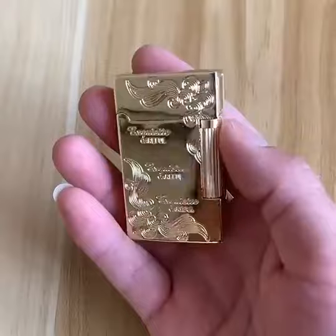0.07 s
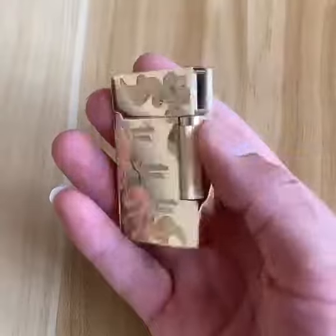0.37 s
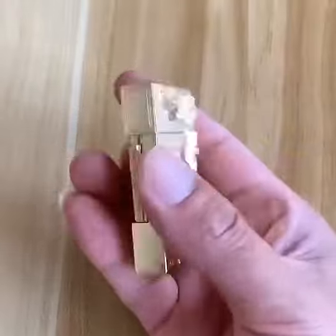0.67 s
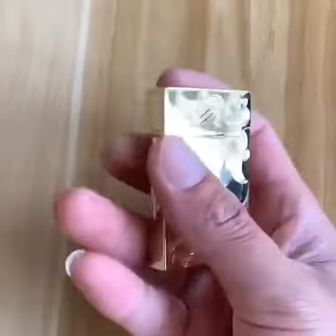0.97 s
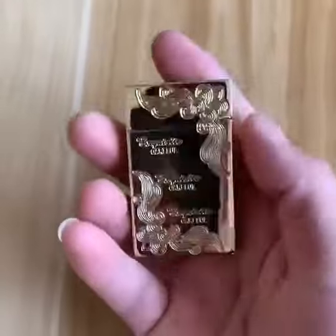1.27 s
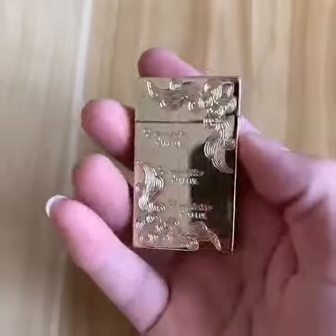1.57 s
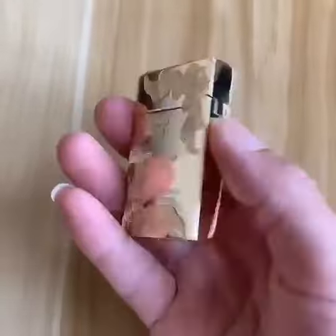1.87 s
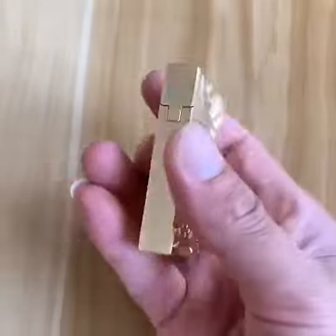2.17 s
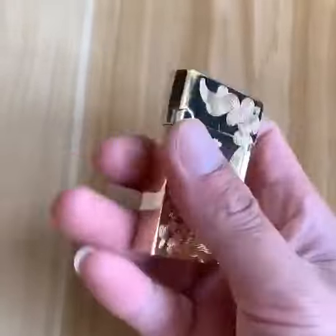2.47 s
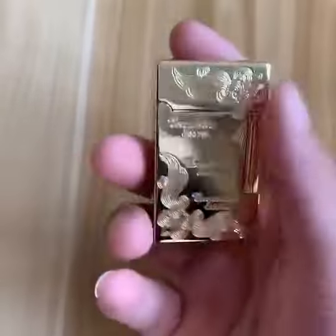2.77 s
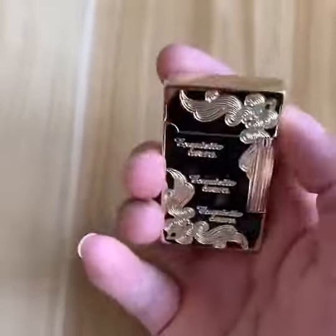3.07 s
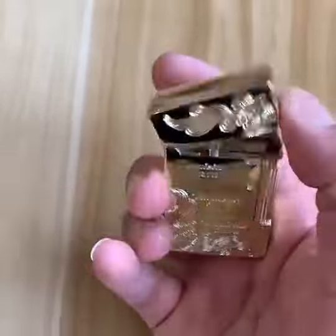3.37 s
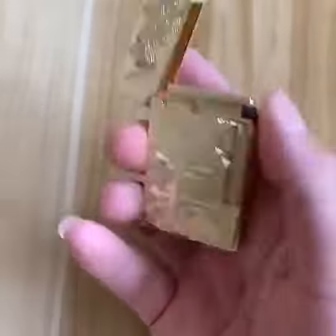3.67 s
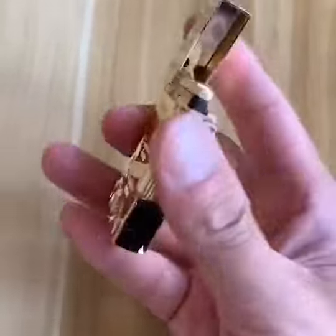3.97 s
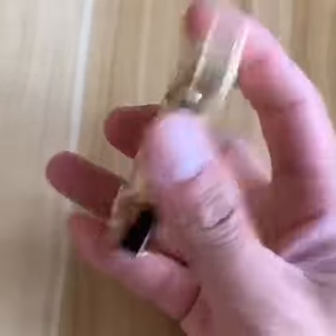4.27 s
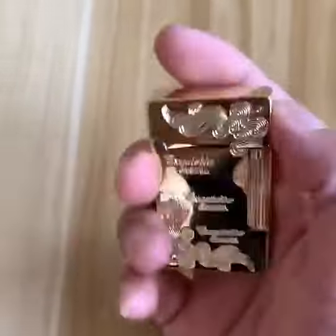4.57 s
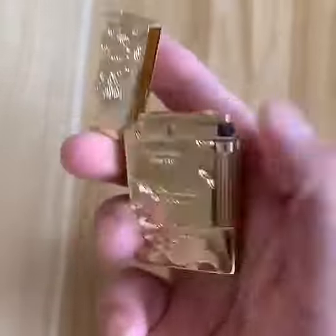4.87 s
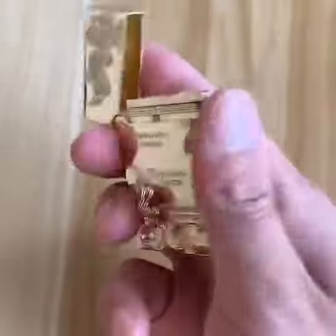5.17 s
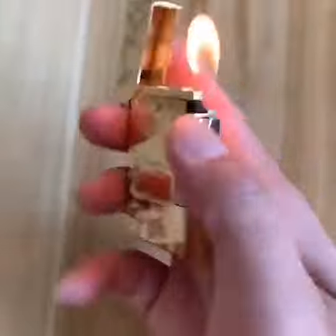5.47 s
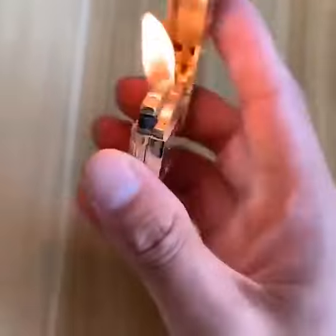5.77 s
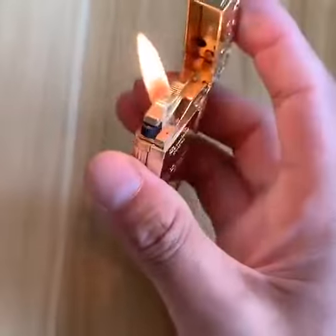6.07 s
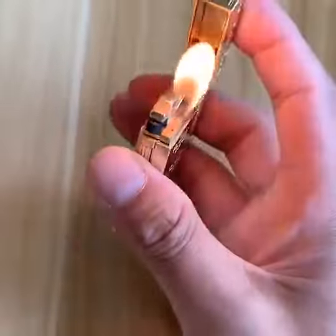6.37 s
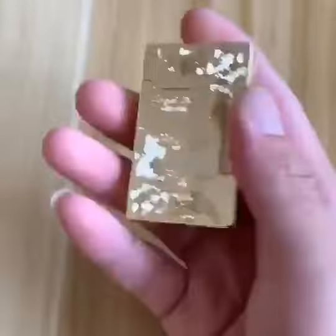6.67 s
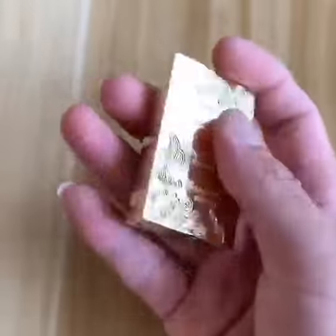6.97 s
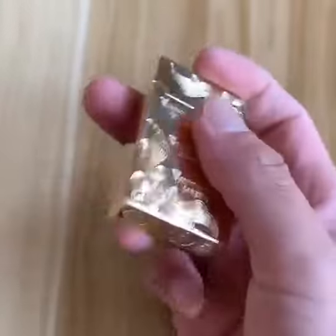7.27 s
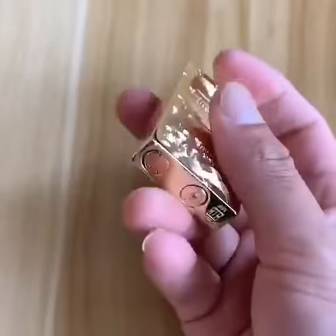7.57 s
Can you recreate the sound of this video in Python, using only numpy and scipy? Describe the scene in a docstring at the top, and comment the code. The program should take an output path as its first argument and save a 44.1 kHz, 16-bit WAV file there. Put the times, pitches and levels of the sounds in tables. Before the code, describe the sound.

Close up, a heavy lighter opens with a bright ring and clacks closed, then reopens, rasps alight and shuts again in a softly humming room.

```python
"""A heavy metal lighter, close up: twice its lid springs open with a bright ping and is snapped shut.
The sprung lid hits its stop, bounces and rings; shut, the case gives a clack that the hand damps.
In between, the flint wheel rasps once and the gas catches with a soft pop. Fingers brush the case.
Behind it is a small live room with a rush of air and a low hum. A limiter ducks the loudest clicks."""
import sys
import numpy as np
from scipy import signal
from scipy.fft import rfft, irfft, next_fast_len
from scipy.io import wavfile
from scipy.ndimage import uniform_filter1d, minimum_filter1d

SR = 44100
rng = np.random.default_rng(int(sys.argv[2]) if len(sys.argv) > 2 else 0)


def bounce(signal):
    """Save signal as a 16-bit WAV file at the path given by the first command-line argument."""
    frames = np.transpose(np.atleast_2d(signal))
    limited = np.clip(frames, -1, 1)
    pcm = np.round(limited * 32767).astype(np.int16)
    wavfile.write(sys.argv[1], SR, pcm)


N = 344421


def amp(db):
    """Decibels to gain."""
    return 10 ** (np.asarray(db) / 20)


def unit(x):
    """Scales to rms 1."""
    return x / np.sqrt(np.mean(x ** 2) + 1e-20)


def curve(points, hz):
    """Reads a breakpoint curve along a log-frequency axis."""
    f, value = np.transpose(points)
    return np.interp(np.log(hz + 1), np.log(f + 1), value)


def add(mix, s, sound):
    """Mixes a sound in at s seconds."""
    part = mix[round(s * SR):][:len(sound)]
    part += sound[:len(part)]


def eq(x, points, size=2048):
    """Minimum-phase EQ through (f/Hz, gain/dB) points."""
    log_gain = np.log(amp(curve(points, abs(np.fft.fftfreq(size, 1 / SR)))))
    taps = np.fft.ifft(np.exp(np.conj(signal.hilbert(log_gain)))).real
    return signal.fftconvolve(x, taps)[:len(x)]


def drift(hz):
    """Smooth random modulation, rms 1, rolling off above hz."""
    f = np.fft.rfftfreq(N, 1 / SR)
    return unit(irfft(rfft(rng.standard_normal(N)) * np.exp(-(f / hz) ** 2), N))


def crack(decay_s, size=512):
    """One contact transient: a dense, flat burst of energy 1, gone in a few milliseconds."""
    age = (np.arange(size) + 1) / SR / decay_s
    swell = age * np.exp(-age)
    burst = rng.standard_normal(size) * swell
    for _ in range(3):  # whiten, then tighten the envelope again
        spectrum = rfft(burst)
        burst = irfft(spectrum / (abs(spectrum) + 1e-12)) * swell ** (1 / 4)
    return burst / np.linalg.norm(burst)


# lag of the right microphone: f/Hz, delay/s
MIC_LAG = [(2000, .0001), (4000, .000078), (5300, .000094), (8200, .00012), (12200, .000122)]
def mic_pair(x):
    """Direct sound reaches the right microphone a little after the left."""
    size = next_fast_len(N)
    hz = np.fft.rfftfreq(size, 1 / SR)
    lag = np.exp(-2j * np.pi * hz * curve(MIC_LAG, hz))
    return np.array([x, irfft(rfft(x, size) * lag, size)[:N]])


# tone of the air bed: f/Hz, relative level/dB
AIR_EQ = [(12, -32.5), (22, 1.5), (32, -15.5), (60, -8.5), (145, -7.5), (176, -6), (259, -12), (290, -13.5),
          (463, -19.5), (531, -15.5), (590, -26.5), (720, -22.5), (922, -28.5), (1300, -31.5), (1600, -30),
          (2170, -41), (3900, -46), (5600, -53.5), (7600, -59), (11000, -62.5), (14000, -67),
          (15000, -85.5)]
# its stereo image: f/Hz, left-right correlation
AIR_CORRELATION = [(60, 1.0), (130, 0.99), (290, 0.98), (640, -0.39), (1410, 0.2), (3100, -0.71),
                   (5200, -0.5), (8000, 0.9), (11500, -0.81), (14000, .3)]
# lead of its left side: f/Hz, phase/rad
AIR_LEAD = [(20, 0), (180, .13), (500, .4), (1500, 0)]
def room_air(level_db=-42.5):
    """A low, steady rush of air whose level wavers slightly."""
    hz = np.fft.rfftfreq(N, 1 / SR)
    left, other = rfft(rng.standard_normal((2, N)))
    alike = np.clip(curve(AIR_CORRELATION, hz), -1, 1)
    right = (alike * left + np.sqrt(1 - alike ** 2) * other) * np.exp(-1j * curve(AIR_LEAD, hz))
    air = irfft(np.array([left, right]) * amp(curve(AIR_EQ, hz)), N)
    return unit(air) * amp(level_db + .8 * drift(hz=5))


# low drone of the room: f/Hz, level/dB
HUM_TONES = [(68, -57.5), (175.5, -49.5), (286, -61), (528, -64)]
# faint fan whine: f/Hz, level/dB
FAN_TONES = [(1125, -79.5), (1497, -75), (1610, -75)]
def room_hum():
    """Hum and fan tones, each wavering in level and phase."""
    hum, t = np.zeros(N), np.arange(N) / SR
    for hz, db in HUM_TONES + FAN_TONES:
        peak = np.sqrt(2) * amp(db + .61 * drift(hz=3.5))
        hum += peak * np.sin(2 * np.pi * hz * t + .8 * drift(hz=3.3))
    return hum


# early reflections: t/s, relative level/dB
REFLECTIONS = [(0.0156, -22.5), (0.0186, -24.5), (0.0322, -23), (0.0368, -24), (.0408, -24), (0.045, -27.5)]
# reverb time: f/Hz, t60/s
REVERB_DECAY = [(500, .5), (2000, 0.55), (4200, 0.6533), (5400, 0.61), (7000, 0.5), (9500, 0.53),
                (11400, 0.4659), (14000, 0.31), (15000, 0.03)]
# reverb width: f/Hz, side over mid/dB
REVERB_WIDTH = [(1000, -9.5), (2800, 8), (4000, -1), (5400, 9.5), (6700, -8.5), (8300, -19), (10500, 4),
                (12300, 21), (14000, -2)]
def room_reverb(send, predelay_s=.0095, build_s=.006):
    """The walls return single echoes and a diffuse tail whose top end dies first."""
    t = np.arange(SR) / SR
    build = 1 - np.exp(-np.maximum(t - predelay_s, 0) / build_s)
    taps = amp(-30.5) * build * rng.standard_normal((2, SR))
    for delay, db in REFLECTIONS:
        for channel in taps:
            add(channel, delay, amp(db) * rng.choice([-1., 1.], 1))
    hz, age, bands = signal.stft(taps, SR, nperseg=256)
    bands = bands * amp(-60 * age / curve(REVERB_DECAY, hz)[:, None])
    width = amp(curve(REVERB_WIDTH, hz))[:, None]
    mid_side_gain = np.array([np.ones_like(width), width]) / np.hypot(1, width)
    mid, side = signal.istft(bands * mid_side_gain, SR, nperseg=256)[1]
    return signal.fftconvolve(send[None], np.array([mid + side, mid - side]), axes=1)[:, :N]


def hand_scatter(x, level_db=-13):
    """The cupped hand throws very short reflections, different at each microphone."""
    return amp(level_db) * np.array([signal.oaconvolve(x, crack(decay_s=.00015))[:N] for _ in range(2)])


# finger strokes: peak t/s, level/dB, half-width/s
STROKES = [(0.075, -65, 0.061), (0.83, -64, 0.018), (1.096, -71, 0.027), (2.394, -67.5, 0.019),
           (7.2, -73, 0.069), (7.355, -69.5, 0.041)]
# tone of skin on metal: f/Hz, relative level/dB
SKIN_EQ = [(1000, 6), (4000, 8), (7000, 1), (10000, -2), (14000, -21)]
def fingers():
    """Skin slides on the polished case in faint, brief hisses."""
    t = np.arange(N) / SR
    envelope = sum(amp(db) * np.exp(-((t - s) / width) ** 2) for s, db, width in STROKES)
    return envelope * unit(eq(rng.standard_normal(N), SKIN_EQ))


# the gas catches: t/s, level/dB, starting f/Hz, decay/s
GAS_PUFFS = [(5.283, -29, 90, 0.012), (5.297, -26.5, 199, 0.014), (5.338, -19, 276, 0.0079),
             (5.361, -24.5, 128, 0.0089)]
def flame(octave_drop_s=.0075, attack_s=.00069):
    """Each puff of burning gas is a low pressure swing that drops in pitch as the flame swells."""
    pop, t = np.zeros(N), np.arange(SR // 4) / SR
    for s, db, hz, decay_s in GAS_PUFFS:
        cycles = np.cumsum(hz / (1 + t / octave_drop_s)) / SR
        envelope = (1 - np.exp(-t / attack_s)) * np.exp(-t / decay_s)
        add(pop, s, amp(db) * envelope * np.sin(2 * np.pi * cycles))
    return pop


# the thumb nudges the wheel, spins it and follows through: t/s, length/s, relative level/dB
THUMB_PUSHES = [(5.218, 0.0096, -23.5), (5.2381, 0.024, -2), (5.263, .011, -11.5), (5.277, 0.026, -21)]
# single teeth catch hard: t/s, pre-EQ level/dB
TOOTH_TICKS = [(5.2515, -6), (5.2565, -0.5), (5.2609, 1.5), (5.2622, 3.5), (5.2695, -3), (5.2804, -4),
               (5.3, -14.5), (5.3112, -23)]
# tone of the rasp: f/Hz, gain/dB
RASP_EQ = [(400, -32), (1100, -19.5), (1650, -8.5), (2300, -7.5), (2750, -3.5), (3080, 6.5), (3450, 0),
           (4200, -1.5), (4800, -2), (5500, -2.5), (6500, -0.5), (7600, -8.5), (10000, -8), (13000, -10),
           (13900, -3), (14700, -36)]
def flint_wheel(tooth_hz=634, bite=.6, coast_s=.005):
    """The wheel speeds up and coasts, its teeth tearing grains off the flint: (direct, reverb send)."""
    t = np.arange(N) / SR
    speed = sum(amp(db) * np.clip((t - s) / push, 0, 1) * np.exp(-np.maximum(t - s - push, 0) / coast_s)
                for s, push, db in THUMB_PUSHES)
    tooth_rate = tooth_hz * (1 + .2 * drift(hz=147.4))
    teeth = 1 + bite * np.cos(2 * np.pi * np.cumsum(tooth_rate) / SR)
    grit = rng.standard_normal(N) * amp(1.9 * np.minimum(rng.exponential(1, N), 4))
    rasp = amp(-14) * unit(teeth * grit) * speed
    for s, db in TOOTH_TICKS:
        add(rasp, s, amp(db) * crack(decay_s=.00037))
    rasp = eq(rasp, RASP_EQ)
    return rasp, amp(-22) * rasp


def lead_in_hiss(length_s):
    """A brief hiss that swells into the click."""
    ramp = np.linspace(0, 1, round(length_s * SR))
    return ramp ** 2 * rng.standard_normal(len(ramp))


def metal_ring(modes, hit, waver_db=2.5, waver_hz=18, attack_s=.002):
    """Struck metal rings with its own mix of modes for each hit; they waver as lid and hand move."""
    ring, t = np.zeros(SR), np.arange(SR) / SR
    for hz, t60, *levels in modes:
        rate, phase = rng.random(2)
        waver = waver_db * np.sin(2 * np.pi * (waver_hz * (.5 + rate) * t + phase))
        ring += amp(levels[hit] + waver - 60 * t / t60) * np.sin(2 * np.pi * hz * t)
    attack = np.sin(np.pi / 2 * np.minimum(t / attack_s, 1)) ** 2
    return attack * ring


CHIME_HZ, BELL_HZ, PING_HZ, CLINK_HZ = 4953, 5520, 11372, 13997  # the metal's clearest partials
# the lid snaps shut: t/s, relative rim level/dB, relative clack level/dB
SHUT_HITS = [(4.3179, 13, 12.5), (6.5194, 11, 9.5)]
# dull touch of the rim: f/Hz, gain/dB
RIM_EQ = [(200, -36.5), (800, -23), (1400, -18.5), (1850, 3), (2250, 10), (2700, -1), (3150, 2),
          (3900, 6.5), (4600, 3), (6600, -2.5), (9000, -23.5), (15000, -41.5)]
# hard clack of the case: f/Hz, gain/dB
CLACK_EQ = [(500, -23), (2000, -7), (3100, -9.5), (4800, -2), (5500, 0), (6700, -1.5), (7600, -10),
            (8800, 0.5), (10300, -7), (11300, -1.5), (12300, -6), (13900, 9), (14600, -21.5)]
# hand-damped modes of the shut case: f/Hz, t60/s, relative level/dB on hit 1, on hit 2
CLINK_MODES = [(1821, 0.04, -25.5, -29), (2350, 0.05, -28.5, -29), (3636.5, .04, -27, -29.5),
               (3859.5, .035, -28.5, -27), (3896, .06, -26.5, -26), (4030, .03, -28, -22.5),
               (6619.5, .03, -27.5, -39), (8780, 0.0037, -25.5, -30), (PING_HZ, 0.069, -28.5, -22),
               (CLINK_HZ, .07, -25.5, -26.5)]
# what the case throws into the room, shifting with the grip: f/Hz, level/dB on hit 1, on hit 2
CASE_SEND_EQ = [(500, -15.5, -18), (1096, -9.5, -6), (1640, 4, 6), (2040, 6.5, 8.5), (2400, 12, 10.5),
                (3000, 4, 4.5), (3700, 12, 9.5), (4730, 10, 5.5), (5240, 4, 12), (6650, 14.5, 8),
                (7490, 4, 6), (8700, 12, 11.5), (9500, 5, 3.5), (11300, 10.5, 10), (12300, 6.5, 6),
                (13950, 17, 15.5), (14600, -13, -14)]
def lid_shutting(swell_s=.02, clack_delay_s=.0012, buzz_decay_s=.004):
    """A hiss swells, the rim lands, then the case clacks, buzzes and clinks: (direct, reverb send)."""
    rim, clack, clink, send = np.zeros((4, N))
    t = np.arange(SR // 20) / SR
    for hit, (s, rim_db, clack_db) in enumerate(SHUT_HITS):
        clack_s = s + clack_delay_s
        buzz = rng.standard_normal(len(t)) * np.exp(-t / buzz_decay_s)  # the lid settles on the case
        grip_eq = [(hz, levels[hit]) for hz, *levels in CASE_SEND_EQ]
        add(rim, s - swell_s, amp(rim_db - 30) * lead_in_hiss(swell_s))
        add(rim, s, amp(rim_db) * crack(decay_s=.00042))
        add(clack, clack_s, amp(clack_db) * crack(decay_s=.00057))
        add(clack, clack_s, amp(clack_db - 30) * buzz)
        add(clink, clack_s, metal_ring(CLINK_MODES, hit))
        add(send, clack_s, eq(signal.unit_impulse(len(t)), grip_eq))
    direct = eq(rim, RIM_EQ) + amp(4.5) * eq(clack, CLACK_EQ) + amp(-3.5) * clink
    return direct, send + amp(5.5) * clink


# the lid hits its stop: t/s, pre-EQ level/dB
OPEN_HITS = [(3.4912, 24), (4.7161, 22)]
# tone of that click: f/Hz, gain/dB
CLICK_EQ = [(200, -45), (900, -31.5), (2000, -6), (2750, -18), (3300, -8.5), (4200, 8.5), (5400, -6.5),
            (6200, -1), (7100, 4), (8000, -8.5), (10000, -8.5), (11800, -1.5), (13000, -21), (14500, -38.5)]
# it bounces on the stop: t/s, pre-EQ level/dB
CHATTER_HITS = [(3.4982, 0), (3.5052, -4), (3.511, -8), (4.723, -3), (4.73, -3.5), (4.7377, -5.5)]
# tone of the bounces: f/Hz, gain/dB
CHATTER_EQ = [(500, -40), (2000, -16), (3200, -8), (6000, -22), (9000, 2), (11500, -2), (12600, -18),
              (14000, -47)]
# modes of the open lid: f/Hz, t60/s, level/dB on hit 1, on hit 2
PING_MODES = [(3820, 0.17, -33, -35.5), (4150, .034, -28, -30), (4320, .07, -19.5, -22),
              (4376, .09, -17.5, -21.5), (4430, .05, -22.5, -21), (4483, .15, -20.5, -26.5),
              (4529.5, .05, -21.5, -24.5), (4650, .06, -24.5, -27), (CHIME_HZ, 0.19, -27, -25.5),
              (4990, 0.0152, -27, -26.5), (BELL_HZ, .3, -27, -29.5), (5480.5, 0.03, -26, -25.5),
              (5569, 0.15, -25, -27), (5690, .06, -25.5, -22.5), (PING_HZ, 0.13, -7, -7),
              (11750, .035, -15.5, -20), (11920, .06, -11.5, -14), (12120, .04, -16.5, -20.5)]
# the lid spreads its lower tones into the room and beams the highest at the microphones: f/Hz, gain/dB
LID_SEND_EQ = [(2000, 3.5), (3800, 0.5), (4500, 4), (4750, -1), (4960, 4), (5250, -3.5), (5540, 4),
               (6050, -12.5), (7000, -5.5), (10500, 0), (11370, -4.5), (12000, -3), (13000, -10)]
def lid_opening(swell_s=.016):
    """The spring throws the lid against its stop, where it chatters and rings: (direct, reverb send)."""
    click, chatter, ping = np.zeros((3, N))
    for hit, (s, db) in enumerate(OPEN_HITS):
        add(click, s - swell_s, amp(db - 39) * lead_in_hiss(swell_s))
        add(click, s, amp(db) * crack(decay_s=.0007))
        add(ping, s, metal_ring(PING_MODES, hit))
    for s, db in CHATTER_HITS:
        add(chatter, s, amp(db) * crack(decay_s=.0003))
    click, chatter = eq(click, CLICK_EQ), eq(chatter, CHATTER_EQ)
    send = eq(amp(-15.5) * click + amp(3.5) * chatter + ping, LID_SEND_EQ)
    return click + chatter + ping, send


def scene():
    """The lighter up front in the hand, over its reverb and the room tone."""
    direct, sends = zip(lid_opening(), lid_shutting(), flint_wheel())
    lighter = sum(direct) + fingers()
    close_up = mic_pair(lighter + flame()) + hand_scatter(lighter)
    return close_up + room_reverb(sum(sends)) + room_air() + mic_pair(room_hum())


def limiter(x, threshold_db=-3.5, ratio=4.02, release_db_per_s=482, window=90):
    """Ducks the mix under each loud click and recovers within a few hundredths of a second."""
    peak = -minimum_filter1d(-abs(x).max(0), window)
    over_db = np.maximum(20 * np.log10(peak + 1e-9) - threshold_db, 0)
    release_db = np.arange(N) / SR * release_db_per_s
    duck_db = np.maximum.accumulate(over_db * (1 - 1 / ratio) + release_db) - release_db
    return x / amp(uniform_filter1d(duck_db, window))


def record(dry, high_cut_hz=15600):
    """Master chain: a quick fade-in after a moment of near silence, the limiter, a steep high cut."""
    fade_in = amp(np.interp(np.arange(N) / SR, [.074, .083], [-60, 0]))
    high_cut = signal.firwin(255, high_cut_hz, window=("kaiser", 9), fs=SR)
    return signal.oaconvolve(limiter(dry * fade_in), high_cut[None], "same")


dry = scene()
out = record(dry)
bounce(out)
```